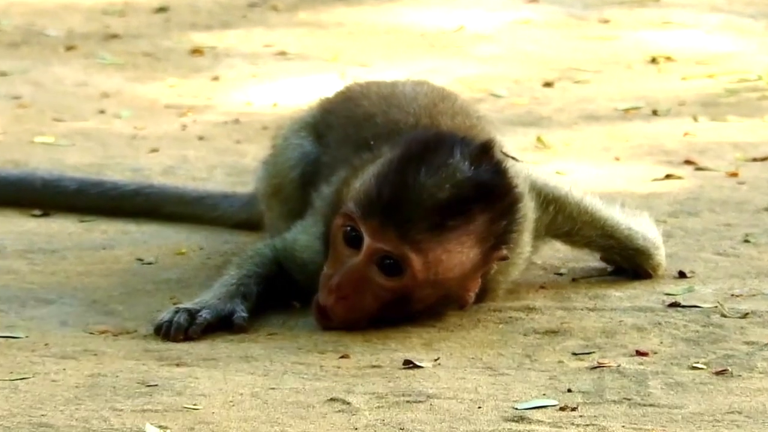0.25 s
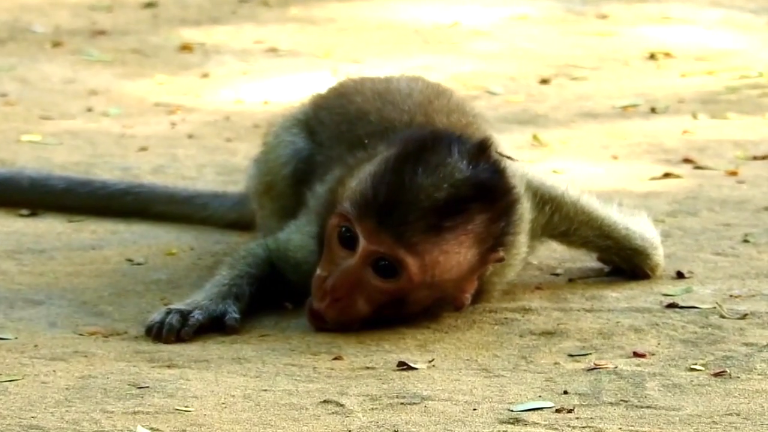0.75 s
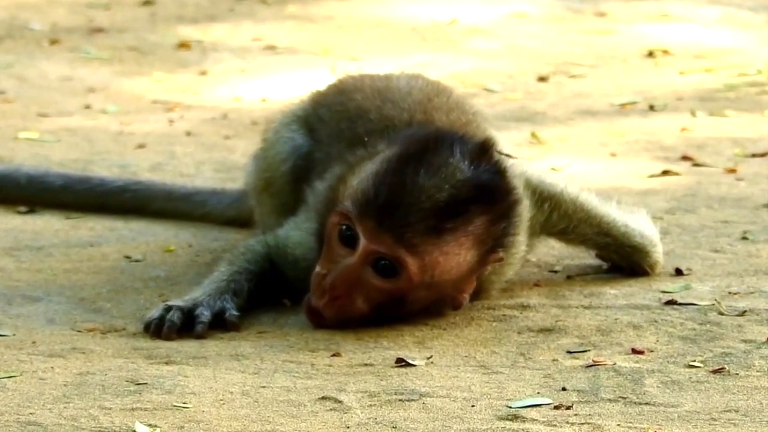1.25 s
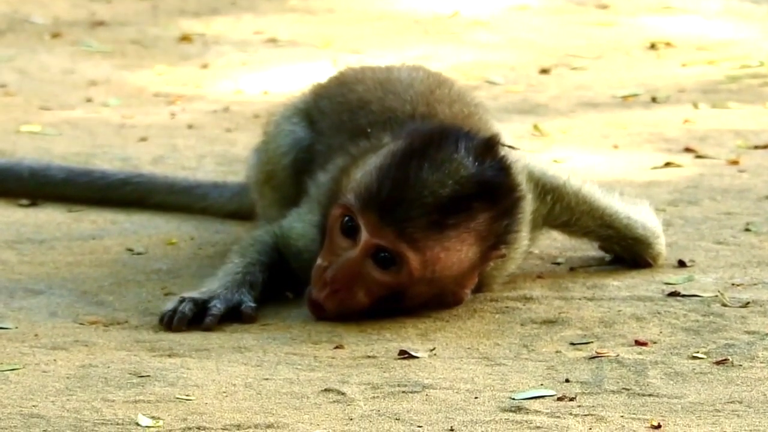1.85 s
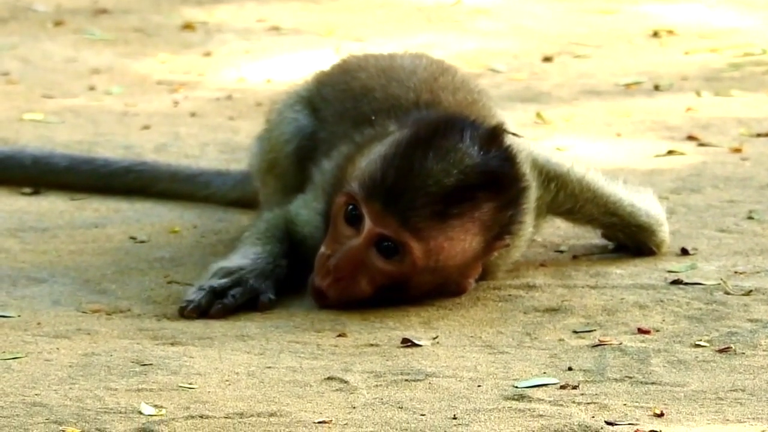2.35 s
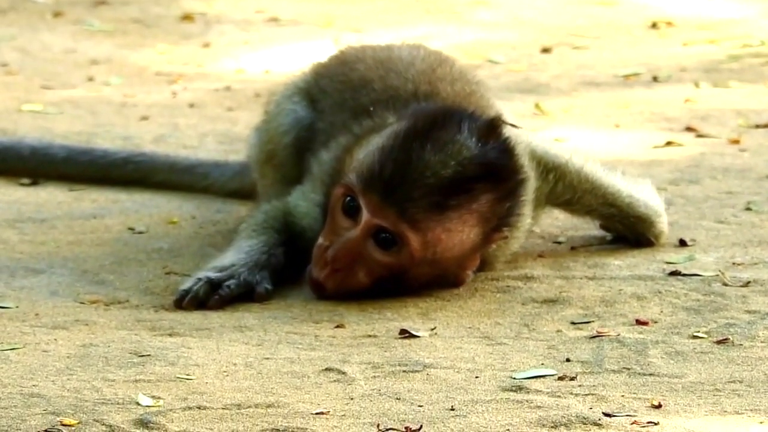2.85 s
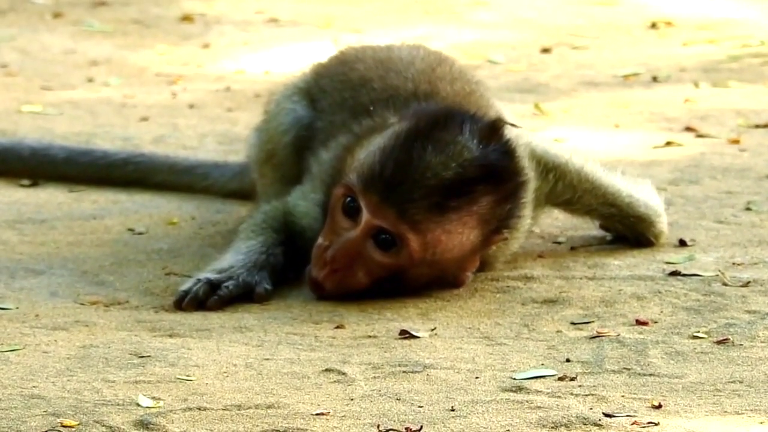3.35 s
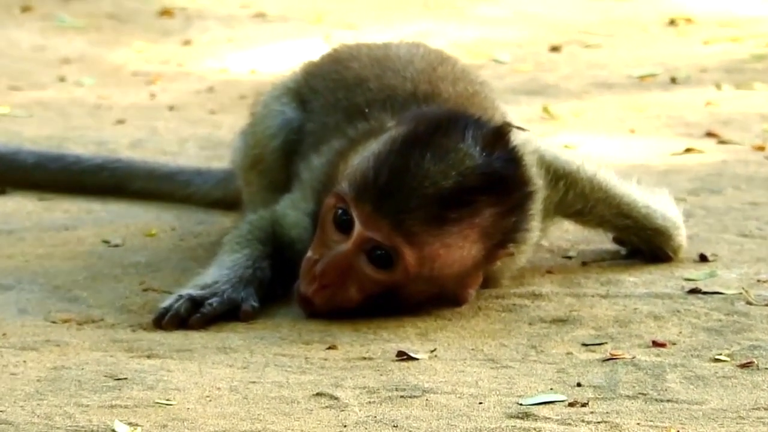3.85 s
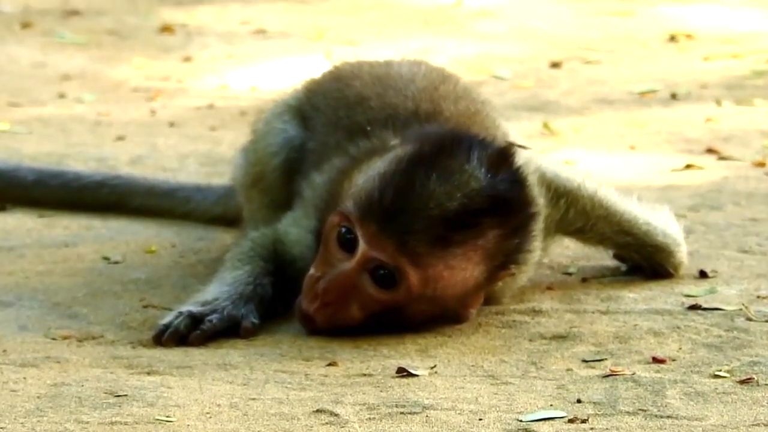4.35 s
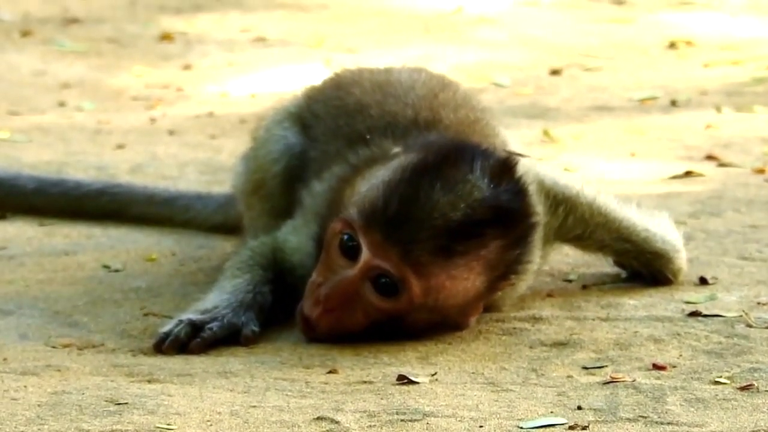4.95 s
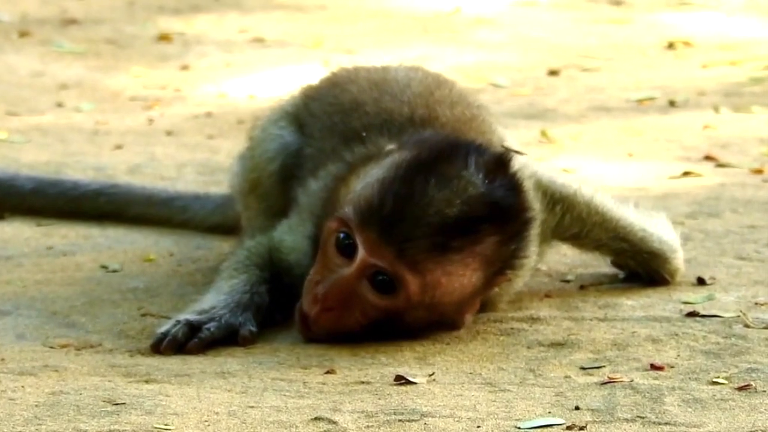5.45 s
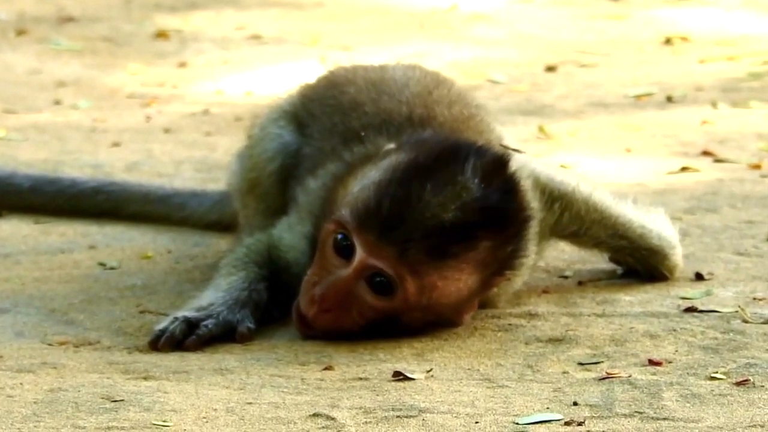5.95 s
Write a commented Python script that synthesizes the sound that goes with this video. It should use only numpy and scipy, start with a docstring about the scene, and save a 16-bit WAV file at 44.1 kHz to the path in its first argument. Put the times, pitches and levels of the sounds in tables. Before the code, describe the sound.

Outdoors, a few metres from the microphone, a young monkey whimpers over and over in thin, plaintive calls of nearly steady pitch. Then come two much louder, piercing screams that drop in pitch and turn hoarse, with a yelp between them. Faint scuffs on hard dirt accompany the screams. Trees and walls add a brief echo, and the background is silent.

```python
"""A young monkey calls from hard ground, a few metres from a stereo microphone.
Its vocal folds and throat give a chirp, seven whimpers, a rising cry, a yelp and shrill whistles
that break into rasps. Hands and feet scuff the dirt. Trees and walls give a short echo;
a noise suppressor turns down faint sound and chops the tails."""
import sys
import numpy as np
from scipy import signal
from scipy.fft import rfft, irfft, next_fast_len
from scipy.io import wavfile
from scipy.ndimage import uniform_filter1d

SR = 44100
rng = np.random.default_rng(int(sys.argv[2]) if len(sys.argv) > 2 else 0)


def dump_mix(stems):
    """Bounce the given channels to the path in sys.argv[1] as a 16-bit WAV at rate SR."""
    frames = np.atleast_2d(stems).T  # one column per channel
    limited = np.clip(frames, -1, 1)  # hard clip at full scale
    pcm = np.round(limited * 32767).astype(np.int16)
    wavfile.write(sys.argv[1], SR, pcm)


N = 273861

# Scuffs on dirt. Each row: start in seconds, decay time in seconds, level in dB, centre in Hz, width in Hz.
DIRT_SCUFFS = [(0.184, 0.008, -50, 2090, 495), (0.181, 0.014, -57, 788, 397),
               (0.181, 0.046, -64.5, 5840, 1576), (0.215, 0.0089, -45, 795, 398),
               (3.419, 0.019, -39, 1043, 462), (3.801, 0.022, -61, 930, 346), (4.523, 0.32, -75, 371, 411),
               (5.001, 0.064, -57, 373, 416), (5.219, 0.088, -63, 362, 493), (5.251, 0.1, -67, 1810, 800),
               (5.376, 0.1, -50.5, 445, 526), (5.648, 0.076, -47.5, 550, 513), (5.657, 0.17, -53, 218, 158),
               (5.659, 0.068, -42, 1324, 620), (5.749, 0.17, -53, 479, 478),
               (5.803, 0.064, -47.5, 1850, 890), (5.943, 0.11, -49.5, 660, 487),
               (5.944, 0.04, -47, 1703, 830), (5.987, 0.086, -43, 1770, 930),
               (5.992, 0.099, -48, 4420, 2340), (6.191, 0.03, -48.5, 1905, 577)]
# Chirp, rising cry and yelp, one list each. Each row: time in seconds, pitch in Hz,
# level of harmonics 4-10 in dB, effort (gain of harmonics 1-3) in dB.
CRY_TRACKS = [
    [(0.239, 1451, -48.5, 2.5), (0.253, 1500, -40, 1.9), (0.263, 1548, -40.5, 4.4), (0.272, 1660, -61.5, 2)],
    [(4.512, 1090, -56, -8), (4.56, 1546, -45, 10.5), (4.568, 1610, -39, 14), (4.588, 1548, -45.5, 13),
     (4.606, 1857, -34.5, 18), (4.614, 2076, -42.5, 25), (4.63, 2205, -52.5, 13), (4.656, 2630, -71, 7.5)],
    [(5.362, 1424, -60.5, -12), (5.382, 2218, -61, -4), (5.391, 2547, -59, 19.5), (5.401, 2600, -56.5, 0.5)],
]
# Seven whimpers, each up to its sob. Rows as in CRY_TRACKS.
WHIMPER_TRACKS = [
    [(0.484, 1181, -83, 0), (0.507, 1213, -65.5, -1), (0.563, 1228, -61.5, 3), (0.599, 1278, -49, -0.5),
     (0.665, 1329, -43.5, 4), (0.753, 1368, -48.5, 3.5), (0.779, 1365, -44, -0.5),
     (0.859, 1344, -46.5, 2.5), (0.915, 1264, -48.5, 1.5)],
    [(1.092, 1009, -67.5, 8), (1.114, 1163, -43, 3.5), (1.14, 1205, -47.5, 0.5), (1.162, 1279, -43.5, 0.5),
     (1.27, 1323, -41.5, 3), (1.342, 1277, -51, -1.5), (1.374, 1267, -49.5, -2)],
    [(1.594, 1028, -81.5, -3), (1.612, 1130, -49, -2.5), (1.636, 1248, -55, -5.5), (1.652, 1319, -40.5, -7),
     (1.676, 1273, -45.5, -3), (1.784, 1292, -49.5, 2), (1.8, 1297, -46, -4), (1.872, 1295, -52.5, -2),
     (1.932, 1240, -47, -3.5)],
    [(2.15, 1050, -73.5, -2.5), (2.168, 1154, -51, -2.5), (2.188, 1253, -52, -4), (2.2, 1305, -43.5, -6.5),
     (2.244, 1312, -42.5, 8), (2.388, 1358, -50, -3), (2.424, 1352, -55, -3), (2.502, 1325, -57.5, -1.5),
     (2.558, 1268, -51.5, 1)],
    [(2.768, 1002, -62, 0.5), (2.794, 1156, -49.5, -3.5), (2.828, 1253, -55.5, -5.5),
     (2.848, 1226, -52.5, -3), (2.92, 1272, -50, -0.5), (2.98, 1270, -53.5, 2), (3.108, 1243, -48.5, -4.5),
     (3.125, 1216, -49, -3)],
    [(3.328, 1060, -78, 4.5), (3.344, 1140, -49, -4.5), (3.372, 1328, -46, -0.5),
     (3.384, 1377, -46.5, -1.5), (3.406, 1305, -42, 3), (3.438, 1331, -40, 4.5), (3.472, 1299, -48, -1),
     (3.6, 1331, -50.5, -0.5), (3.67, 1302, -53, -1), (3.712, 1241, -43, 1.5)],
    [(3.918, 1040, -69, -5.5), (3.934, 1154, -54, -2.5), (3.958, 1295, -52, -3), (3.968, 1310, -46, -1),
     (4.028, 1324, -45, -1.5), (4.046, 1299, -48.5, -3), (4.182, 1311, -59, -2.5), (4.252, 1293, -70, -0.5),
     (4.282, 1256, -46.5, 1), (4.298, 1236, -47, 0)],
]
# Sob closing each whimper. Each row: time after the last point in seconds, pitch in Hz,
# change of harmonics 4-10 in dB, change of effort in dB.
SOB_TRACK = [(.022, 1167, -10, -4), (0.032, 1035, -13.5, -9)]
# Mix per call, whimpers first. Each row: 3rd harmonic gain in dB, breath in dB, left minus right in dB.
CALL_MIX = [(-3, -60.5, -0.5), (-2.5, -58, 0.7), (-2, -64.5, 1.2), (-2.5, -60, -0.2), (-1.5, -66, 0.5),
            (-3, -59, -0.5), (0.5, -62, 0.5), (13, -56.5, -1), (-8.5, -47, 0.5), (-38.5, -48, 3)]
# Harmonics 1-3 at zero effort, shaped by throat and ground. Each row: frequency in Hz, level in dB.
LOW_SPECTRUM = [(1000, -51.5), (1180, -36.5), (1275, -32.5), (1310, -47.5), (1365, -44.5), (1550, -41),
                (2090, -43.5), (2300, -39.5), (2430, -53), (2500, -37), (2590, -32.5), (2625, -49.5),
                (2680, -40.5), (2745, -37), (3120, -31), (3400, -41), (3600, -38), (3750, -55.5),
                (4000, -54.5), (4110, -42.5), (4500, -52)]
# Balance of harmonics 4-10. Each row: frequency in Hz, relative level in dB.
TREBLE_SPECTRUM = [(4000, -28), (5300, -12), (6000, 1), (6500, -13.5), (7300, 1.5), (8000, 5.5),
                   (8800, -3.5), (9500, -19), (10200, -55.5), (11200, -57), (12000, -30.5)]
# Throat resonances for breath and rasps. Each row: centre in Hz, width in Hz, gain in dB.
BREATH_MODES = [(1400, 820, -14.5), (3222, 480, 2.5), (3560, 1100, 3.5), (7000, 3000, -28)]
RASP_LOW_MODES = [(2001, 417, -7), (3375, 1240, -8.5)]
RASP_HIGH_MODES = [(4560, 1000, -19.5), (5400, 4500, -4)]
# Rasps. Each row: start in seconds, length in seconds, level in dB, level change in dB,
# treble gain in dB, slap share of the power from 0 to 1.
RASP_BURSTS = [(4.619, 0.32, -43.5, -12.5, -15, 0.03), (4.735, 0.18, -43, 13, 10.5, 0.5),
               (4.842, 0.049, -20, -3, -13, 0.44), (4.889, 0.27, -39, -23.5, -4.5, 0.22),
               (5.346, 0.056, -70, 55.5, -10.5, 0.94), (5.392, 0.17, -37.5, -24, -11.5, 0.05),
               (5.502, 0.069, -51.5, -4, -7, 0.4), (5.545, 0.12, -46, 10.5, 1, 0.1),
               (5.619, 0.037, -28, -2, -13, 0.56), (5.652, 0.07, -25.5, -21, -6, 0.76),
               (5.661, 0.3, -31.5, -38, -3, 0.7)]
# Whistles, one list each. Each row: time in seconds, pitch in Hz, level in dB.
WHISTLE_TRACKS = [
    [(4.7, 7240, -33.5), (4.716, 7220, -15), (4.724, 7120, -19), (4.732, 7240, -14.5), (4.742, 7500, -25.5),
     (4.758, 8450, -32.5), (4.78, 7900, -28), (4.796, 7110, -27.5)],
    [(4.798, 7450, -26.5), (4.804, 7390, -19.5), (4.811, 6820, -12.5), (4.813, 5800, -22),
     (4.819, 4900, -27.5), (4.823, 3400, -24.5), (4.828, 3100, -13.5), (4.833, 2800, -26),
     (4.846, 2010, -36.5)],
    [(4.874, 3300, -28), (4.884, 2950, -24), (4.892, 2500, -34.5)],
    [(5.485, 8200, -45), (5.495, 8000, -30), (5.501, 7800, -26), (5.507, 7350, -50.5)],
    [(5.54, 7600, -44), (5.558, 6900, -31.5), (5.563, 7050, -14), (5.567, 7270, -22.5), (5.574, 7270, -14),
     (5.581, 6560, -15), (5.583, 6100, -31), (5.587, 5950, -14), (5.591, 5300, -32.5), (5.604, 4300, -43.5)],
    [(5.62, 3300, -30), (5.632, 3100, -25), (5.647, 2800, -35)],
]
# Whistle side tones. Each row: frequency in Hz, level against the main tone in dB.
SIDE_TONE_SPECTRUM = [(3600, -34), (6000, -11), (8500, -40.5), (11000, -33), (12600, -50), (14500, -33.5),
                      (16000, -55.5)]
# Band that leaves reflect best: centre in Hz, width in Hz, gain in dB.
LEAF_BAND = (6800, 3000, 9.9)


def undb(db):
    return 10 ** (np.asarray(db) / 20)


def unit(x):
    return x / np.sqrt(np.mean(x ** 2))


def smooth(x, samples):
    return uniform_filter1d(x, samples, mode="nearest")


def high_pass(x, hz):
    return signal.sosfilt(signal.butter(6, hz, "high", fs=SR, output="sos"), x)


def level_at(hz, spectrum):
    return np.interp(hz, *np.transpose(spectrum))


def resonate(x, modes):
    """Parallel resonances, each applied three times for deep valleys."""
    total = 0
    for hz, width_hz, db in modes:
        rung = x
        for _ in range(3):
            rung = signal.lfilter(*signal.iirpeak(hz, hz / width_hz, SR), rung)
        total += undb(db) * rung
    return total


def flutter(n, rate_hz):
    """Smooth random wobble, RMS 1."""
    k = int(SR / rate_hz)
    return unit(uniform_filter1d(uniform_filter1d(rng.standard_normal(n + 2 * k), k), k)[k:n + k])


def spread(track, edge_s):
    """First sample, a fade at both ends, and each column per sample."""
    times, *columns = np.transpose(track)
    start = int(times[0] * SR)
    t = np.arange(start, int(times[-1] * SR)) / SR
    fade = np.clip(np.minimum(t - times[0], times[-1] - t) / edge_s, 0, 1)
    return start, fade, [np.interp(t, times, column) for column in columns]


def add(out, start, x):
    out[..., start:start + x.shape[-1]] += x[..., :N - start]


def scuff(out, start_s, decay_s, db, hz, width_hz, rise_cycles=5.7):
    """Grit dragged under a hand or foot: a patchy burst, slower to swell the lower it lies."""
    t = np.arange(int((2 * decay_s + 0.023) * SR)) / SR
    envelope = np.minimum(t * hz / rise_cycles, 1) * np.exp(-(t / decay_s) ** 2)
    grit = unit(resonate(rng.standard_normal(len(t)), [(hz, width_hz, 0)]))
    patchy_db = 1.8 * flutter(len(t), 83)
    add(out, int(start_s * SR), undb(db + patchy_db) * envelope * grit)


def harmonics(hz, glide, treble_db, effort_db, third_db, catch_s=0.013, catch_db=14):
    """Ten harmonics of the folds; uneven beats put a noisy skirt round each, stronger higher up."""
    n = len(hz)
    phase = 2 * np.pi * np.cumsum(hz * (1 + 0.003 * flutter(n, 50))) / SR
    low_db = [smooth(effort_db + level_at(k * hz, LOW_SPECTRUM), 260) for k in (0.99, 2, 3.034)]
    remaining_s = np.arange(n)[::-1] / SR
    low_db[2] += third_db + catch_db * np.clip(1 - remaining_s / catch_s, 0, 1)
    high_db = np.array([level_at(k * hz, TREBLE_SPECTRUM) for k in range(4, 11)])
    high_db += treble_db - 10 * np.log10(np.sum(undb(high_db) ** 2, axis=0))
    tone = 0
    for k, db in enumerate([*low_db, *high_db], start=1):
        skirt = 0.0011 * k + (0.2 + 0.5 * glide) * (k > 3)
        rolloff = np.clip((12600 - k * hz) / 300, 0, 1)
        tone += undb(db) * (1 + skirt * flutter(n, 290)) * np.sin(k * phase + k * k) * rolloff
    return np.sqrt(2) * tone


def breath(hz, glide, treble_db, effort_db, breath_db, glide_hiss_db=22, linger_s=0.08, db_per_hz=0.2):
    """Air through the throat: stronger at high pitch, hissing during and just after a glide."""
    keep = np.exp(-1 / SR / linger_s)
    lingering = signal.lfilter([1 - keep], [1, -keep], glide, zi=[keep * glide[0]])[0]
    hiss_db = glide_hiss_db * np.maximum(lingering, glide / 2) + 0.46 * (treble_db - np.mean(treble_db))
    noise = rng.standard_normal(len(hz))
    air = resonate(noise, BREATH_MODES[:-1]) + resonate(noise, BREATH_MODES[-1:]) * undb(hiss_db)
    air = resonate(air, [(centre_hz, width_hz, 0) for centre_hz, width_hz, _ in BREATH_MODES])
    push_db = 0.19 * (effort_db - np.mean(effort_db)) + np.clip(db_per_hz * (hz - np.mean(hz)), -12, 6)
    patchy_db = 3.5 * flutter(len(hz), 25)
    return unit(high_pass(air, 1000)) * undb(breath_db + push_db + patchy_db)


def voice(out, track, third_db, breath_db, pan_db, full_glide_hz_per_s=3500):
    """One cry or whimper: fold harmonics plus breath on a rounded pitch curve."""
    start, fade, (hz, treble_db, effort_db) = spread(track, edge_s=0.007)
    hz = smooth(hz, 350)
    glide = np.clip(abs(np.gradient(hz)) * SR / full_glide_hz_per_s, 0, 1)
    tone = harmonics(hz, glide, treble_db, effort_db, third_db)
    air = breath(hz, glide, treble_db, effort_db, breath_db)
    pan = undb([[pan_db / 2], [-pan_db / 2]])
    add(out, start, fade * (tone + air) * pan)


def rasp(out, start_s, length_s, db, change_db, treble_db, slap_share, slap_hz=429, release_share=0.41):
    """The folds slap irregularly over rushing air; both ring the open throat."""
    ramp = [(start_s, db), (start_s + length_s, db + change_db)]
    start, fade, (level_db,) = spread(ramp, edge_s=0.002)
    n = len(fade)
    release = np.minimum(np.arange(n)[::-1] / n / release_share, 1) ** 2
    cycles = np.cumsum(slap_hz * (1 + 0.4 * flutter(n, 300))) / SR
    slaps = np.diff(np.floor(cycles), prepend=0) * undb(flutter(n, 628))
    air = rng.standard_normal(n) * undb(2 * flutter(n, 120))
    puffs = np.sqrt(slap_share) * unit(slaps) + np.sqrt(1 - slap_share) * air
    rung = resonate(puffs, RASP_LOW_MODES) + undb(treble_db) * resonate(puffs, RASP_HIGH_MODES)
    mouth = signal.sosfilt(signal.butter(8, 7900, fs=SR, output="sos"), rung)
    faint_top = undb(treble_db) * resonate(puffs, [(10000, 10000 / 6, -27.5)])
    add(out, start, fade * release * undb(level_db) * unit(mouth + faint_top))


def whistle(out, track, hoarse_hz_per_s=150000):
    """Stretched folds give one unsteady tone, hoarse in a fast dive; uneven beats add side tones."""
    start, fade, (hz, db) = spread(track, edge_s=0.002)
    n = len(hz)
    dive = uniform_filter1d(np.clip(-np.gradient(hz) * SR / hoarse_hz_per_s, 0, 1), 90)
    jitter = 0.012 * flutter(n, 400) + 0.06 * dive * flutter(n, 1000)
    phase = 2 * np.pi * np.cumsum(hz * (1 + jitter)) / SR
    tone = (1 + (0.1 + 0.25 * dive) * flutter(n, 1200)) * np.sin(phase)
    for ratio in (0.5, 1.5, 2):
        side_db = level_at(ratio * hz, SIDE_TONE_SPECTRUM)
        tone += undb(side_db) * (1 + flutter(n, 800)) * np.sin(ratio * phase)
    add(out, start, high_pass(fade * np.sqrt(2) * undb(smooth(db, 60)) * tone, 1500))


def scatter(x, db, t60_s, rise_s, correlation=0.77):
    """Decaying diffuse reflections, partly alike left and right."""
    t = np.arange(SR // 2) / SR
    mid, side = rng.standard_normal((2, len(t))) * undb(-60 * t / t60_s) * np.minimum(t / rise_s, 1)
    pair = np.sqrt(1 + correlation) * mid + np.sqrt(1 - correlation) * np.array([side, -side])
    return signal.fftconvolve(x, undb(db) * unit(pair) / np.sqrt(len(t)), axes=1)[:, :N]


def echo(x):
    """Near walls answer briefly; far trees ring longer, their stirring leaves smearing the tones."""
    smeared = x * (0.2 + flutter(N, 300))
    smeared += resonate(smeared, [LEAF_BAND])
    walls = scatter(x, db=-14, t60_s=0.27, rise_s=0.015)
    trees = scatter(smeared, db=-23.5, t60_s=0.55, rise_s=0.0034)
    return walls + trees


def microphone(x, lag_s=24e-6):
    """Sound reaches the left port just after the right."""
    size = next_fast_len(N)
    hz = np.arange(size // 2 + 1) * SR / size
    half_lag = np.exp(-1j * np.pi * lag_s * hz)
    return irfft(rfft(x, size) * np.array([half_lag, 1 / half_lag]), size)[:, :N]


def suppressor(x, gate_db=-104, memory_s=0.17, memory_db=-23, slope_db_per_db=1.8):
    """Turns down each band under its threshold, which rises where sound has lasted."""
    frames = dict(nperseg=512, noverlap=384)
    spectrum = signal.stft(x, **frames)[2]
    power = np.mean(abs(spectrum) ** 2, axis=0)
    power = uniform_filter1d(uniform_filter1d(power, 5, axis=0), 5, axis=1)
    keep = np.exp(-128 / SR / memory_s)  # per 128-sample hop
    lasting = signal.lfilter([1 - keep], [1, -keep], power, axis=1)
    threshold = undb(2 * gate_db) + undb(2 * memory_db) * lasting
    under_db = np.minimum(10 * np.log10(power / threshold + 1e-20), 0)
    return signal.istft(spectrum * undb(slope_db_per_db * under_db), **frames)[1][:, :N]


def scene():
    """Calls and scuffs with their echo, in stereo."""
    monkey = np.zeros((2, N))
    whimpers = []
    for track in WHIMPER_TRACKS:
        end_s, _, treble_db, effort_db = track[-1]
        sob = np.array(SOB_TRACK) + [end_s, 0, treble_db, effort_db]
        whimpers.append(np.vstack([track, sob]))
    for track, mix in zip(whimpers + CRY_TRACKS, CALL_MIX):
        voice(monkey, track, *mix)
    for track in WHISTLE_TRACKS:
        whistle(monkey, track)
    for row in RASP_BURSTS:
        rasp(monkey, *row)
    for row in DIRT_SCUFFS:
        scuff(monkey, *row)
    return microphone(monkey + echo(monkey))


def record(dry):
    """Noise suppressor, then a steep low-pass."""
    return signal.sosfilt(signal.ellip(8, 0.2, 70, 15700, fs=SR, output="sos"), suppressor(dry))


dry = scene()
out = record(dry)
dump_mix(out)
```